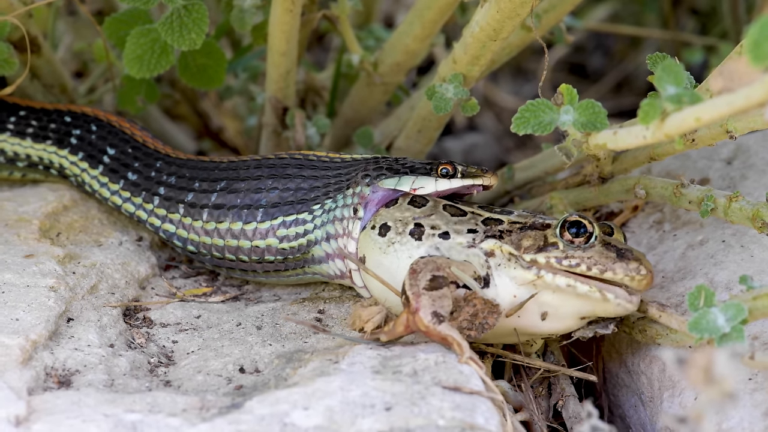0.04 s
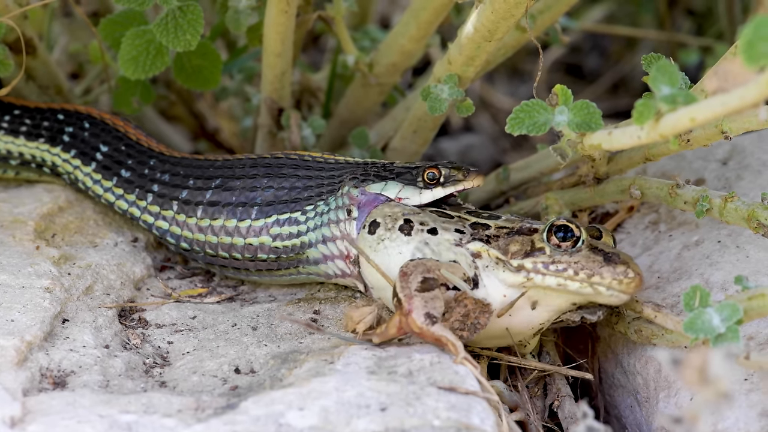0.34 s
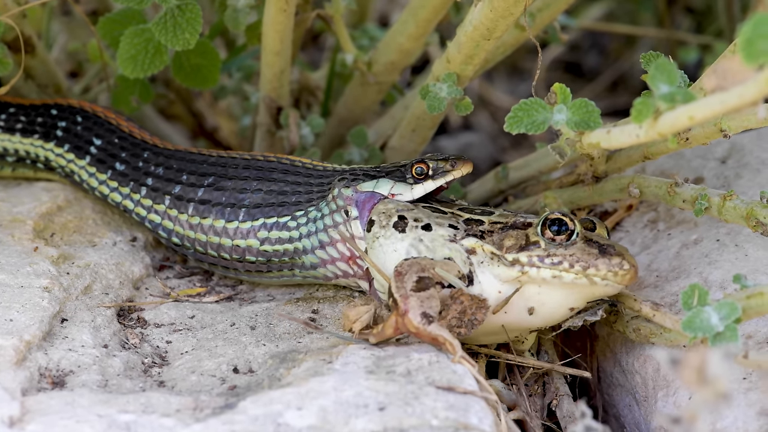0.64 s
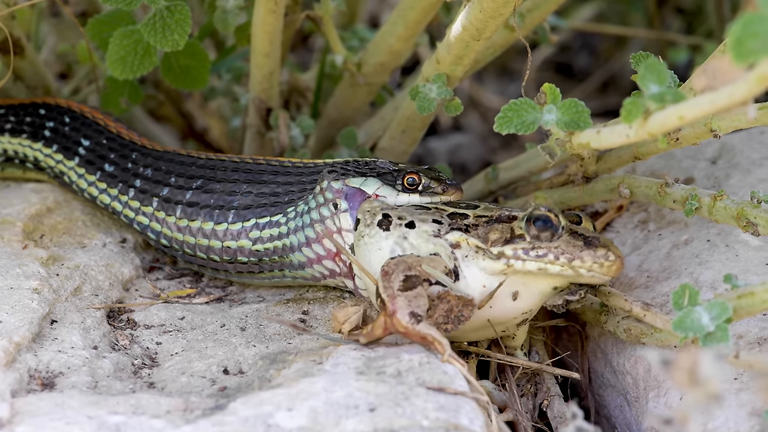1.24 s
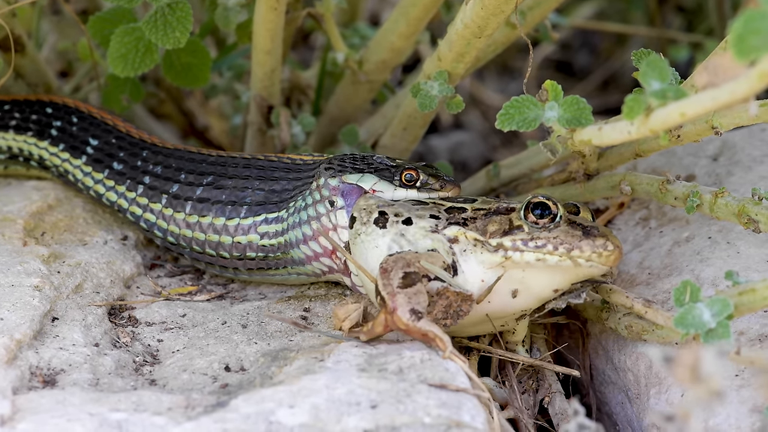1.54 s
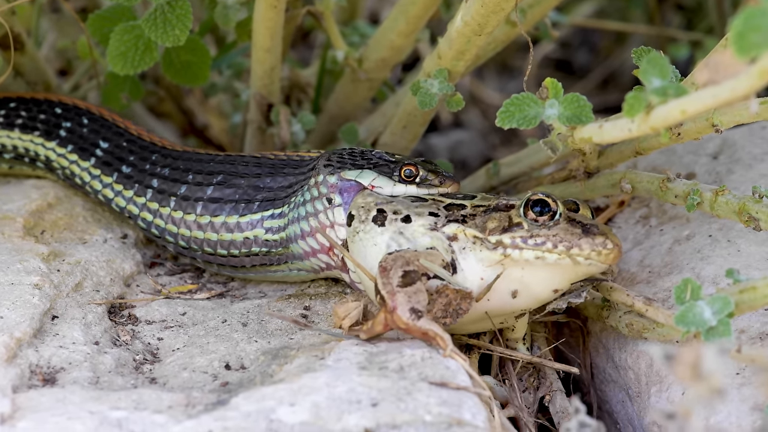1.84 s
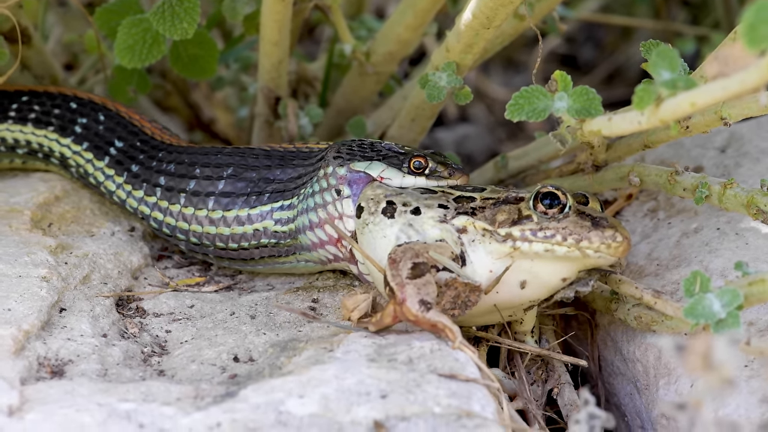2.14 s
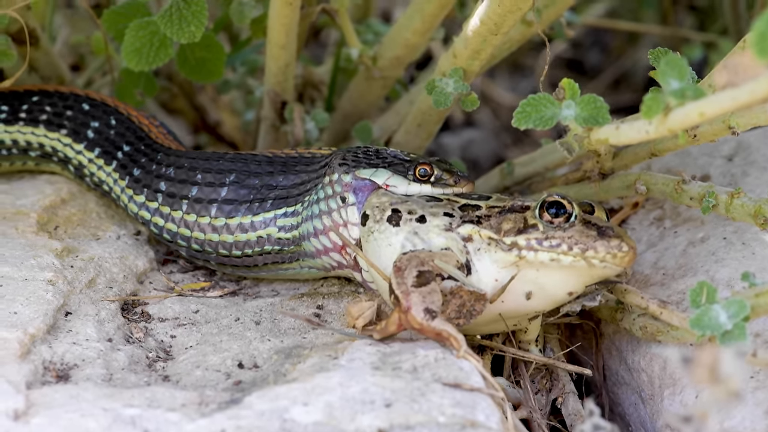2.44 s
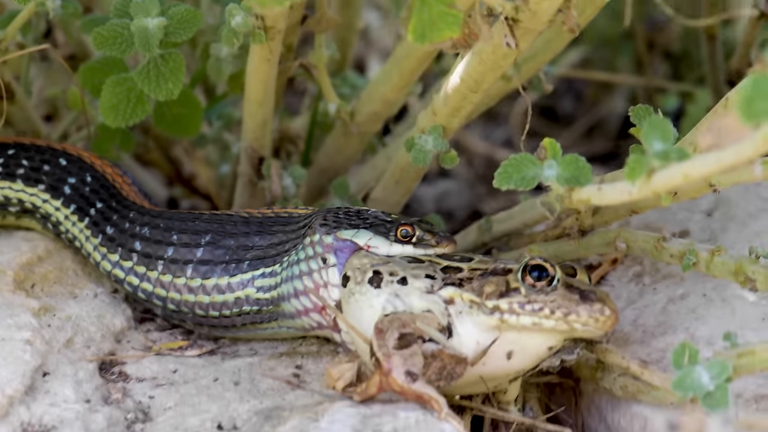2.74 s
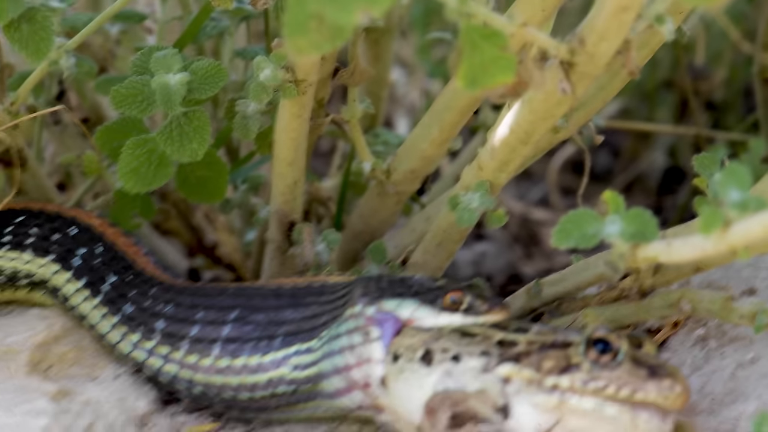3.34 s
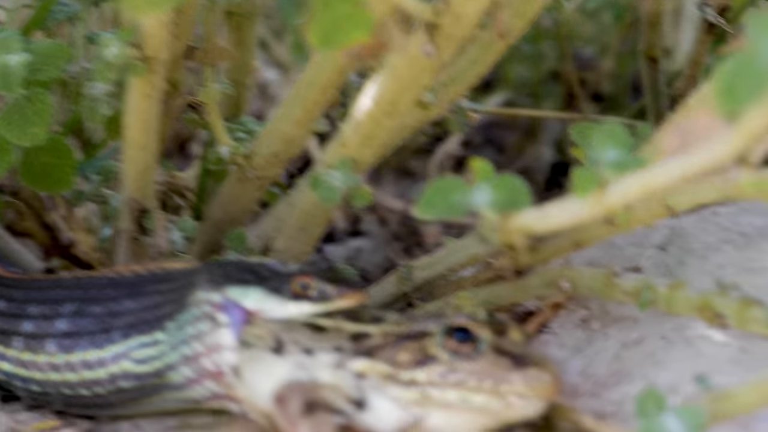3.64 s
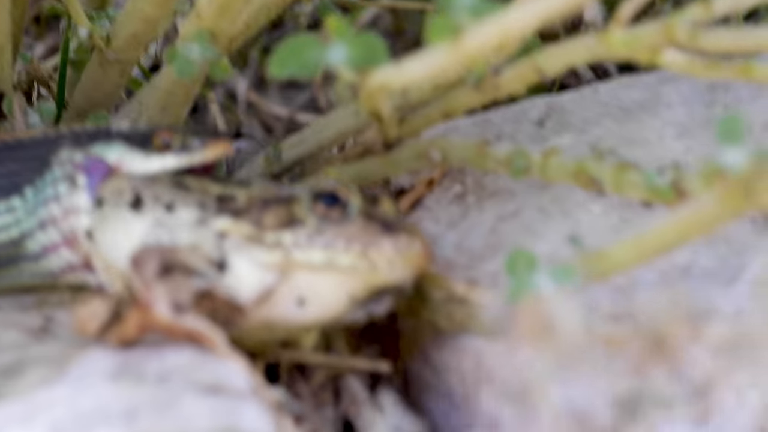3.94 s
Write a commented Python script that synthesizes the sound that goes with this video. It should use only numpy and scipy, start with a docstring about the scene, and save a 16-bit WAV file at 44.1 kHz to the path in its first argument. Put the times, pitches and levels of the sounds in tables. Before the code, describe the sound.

Close to the microphone outdoors, a frog cries twice in distress, about three seconds apart. Between the short, buzzy cries come soft gulps, puffs of air and faint rustling, with distant insect hiss and a low hum behind.

```python
"""Frog distress cries

A frog held by a snake cries twice, close by; a closed-mouth whimper leads in the second cry. Each cry is
a pulse train that rises and sags in pitch and rings a narrow resonance while the mouth snaps open and
slowly shuts. Between cries the frog gulps and pumps air, and dry litter ticks. Distant insects hiss over
a low electrical hum and a thin electronic whine."""
import sys
import numpy as np
from scipy import signal
from scipy.fft import rfft, irfft
from scipy.io import wavfile
from scipy.ndimage import uniform_filter1d

SR = 44100
rng = np.random.default_rng(int(sys.argv[2]) if len(sys.argv) > 2 else 0)


def file_out(sig):
    """Save sig as 16-bit WAV at sys.argv[1]."""
    # one column per channel
    cols = np.atleast_2d(sig).T
    # limit, then scale
    lim = np.clip(cols, -1, 1)
    pcm = np.round(lim * 32767).astype(np.int16)
    wavfile.write(sys.argv[1], SR, pcm)


N = 176400
TIME_S = np.arange(N) / SR
BINS_HZ = np.arange(N // 2 + 1) * SR / N

# Background air: freq_hz, relative_db
AIR_SPECTRUM = [(25, -6), (55, 0), (130, 0), (250, -3.5), (400, -11), (700, -15), (1500, -16), (4000, -17),
                (12000, -18), (14500, -17), (15500, -12)]
# Left-right likeness of air and insects: freq_hz, correlation
STEREO_CORRELATION = [(60, 0.74), (290, 0.99), (640, 0.43), (1400, 0.6), (3100, 0.49), (6800, 0.085),
                      (15000, 0)]
# Electrical hum: freq_hz, rms_db, waver_ratio
HUM_TONES = [(60.4, -53, 0.44), (119.8, -38.5, 0.11), (146.3, -52, 0.59), (177.2, -56, 0.31)]
# Insect chorus loudness: time_s, level_db
INSECT_ENVELOPE = [(0, -44.5), (1.1, -45), (1.4, -45), (2.1, -43), (2.8, -40), (3.4, -37.5), (3.8, -36.5),
                   (4, -39)]
# Insect hiss: freq_hz, relative_db
INSECT_SPECTRUM = [(3000, -16), (5500, -11.5), (7200, -4.5), (8500, -2), (9400, -1), (10500, -12.5),
                   (12500, -14.5), (15500, -8.5)]
# Dry litter ticks: start_s, relative_db, pitch_hz
LITTER_TICKS = [(0.404, -42.5, 4500), (0.4335, -41.5, 2080), (0.9399, -44, 1850), (0.959, -40, 2380),
                (1.0842, -41, 4070), (1.096, -42, 2300), (1.158, -44.5, 3730), (1.2367, -41, 2100),
                (1.344, -40, 3440), (1.4527, -40, 2410), (1.5884, -43, 3460), (1.6978, -42, 4250),
                (1.783, -40.5, 3580), (2.0508, -41.5, 2420), (2.29, -42.5, 4650), (2.422, -39.5, 3730)]
# Stirring in the litter: time_s, gain_db
RUSTLE_ENVELOPE = [(0, -2.5), (.8, -4), (1.1, 0.5), (1.8, -3.5), (2.5, -1.5), (3, -1.5)]
# Dull bumps: start_s, level_db
DULL_BUMPS = [(0.295, -41), (0.612, -40.5), (0.885, -39)]

# Nostril puffs: centre_s, half_length_s, level_db
NOSTRIL_PUFFS = [(2.675, 0.05, -48.5), (2.857, 0.031, -46), (2.962, 0.055, -46.5), (3.096, 0.074, -47),
                 (3.161, 0.019, -45.5), (3.85, 0.16, -56)]
# Nostril air: freq_hz, relative_db
NOSTRIL_SPECTRUM = [(300, -35), (600, -9.5), (780, -12), (930, 10), (1080, -6), (1480, -12.5), (1720, 8),
                    (1950, -13), (2500, -12), (3500, -16.5), (8000, -45)]
# Soft gulps: start_s, decay_s, level_db, pitch_hz
SOFT_GULPS = [(0.876, 0.0051, -31.5, 553), (0.892, 0.008, -42, 670), (2.782, 0.012, -32, 732)]
# Throat clicks before the whimper: start_s, impulse_db
THROAT_CLICKS = [(3.151, -29), (3.16, -25), (3.1653, -25), (3.1731, -21), (3.185, -35)]
# Click resonances: centre_hz, width_hz, gain_db
CLICK_MODES = [(950, 310, -0.74), (2300, 1500, -1.1)]

# Vocal pulse rate per cry: time_s, pitch_hz
CRY_1_PITCH = [(0, 314.4), (.02, 279), (.035, 273), (.055, 284.3), (.07, 312), (.09, 361), (.115, 402),
               (.135, 408), (.17, 384.8), (.215, 362.6), (.24, 331.7), (.255, 337.6), (.29, 233)]
CRY_2_PITCH = [(3.22, 240), (3.275, 253.8), (3.305, 306), (3.345, 242), (3.40, 258.7), (3.45, 261.5),
               (3.475, 275.5), (3.496, 328.5), (3.522, 367.3), (3.534, 409), (3.56, 443.3), (3.58, 450.5),
               (3.61, 438.6), (3.68, 364), (3.72, 274)]
# Effort and mouth shape: time_s, level_db, mouth_hz, upper_hz, ring_hz, ring_width_hz, tilt_db_per_oct
CRY_1_MOUTH = [(0.0, -33, 1920.0, 2630.0, 2080.0, 360.0, -3), (0.022, -31, 2600, 3800, 3460, 269, 1.5),
               (0.05, -26, 2520, 4340, 3680, 370.0, 3.5), (0.08, -18, 2550, 4800, 3600, 360.0, 0.5),
               (0.106, -13.5, 2390, 6070.0, 3410, 150.0, -3.0), (0.135, -13.5, 2220, 5100, 3340, 160.0, -2),
               (0.18, -14.5, 2150, 4870, 3285, 160.0, -4), (0.223, -16.0, 2160, 3660.0, 3080, 290.0, -5.5),
               (0.244, -27, 1360, 2890.0, 3000, 740.0, -3.5), (0.29, -53, 934, 2200.0, 1760.0, 590.0, -18)]
CRY_2_MOUTH = [(3.22, -47, 1450.0, 2600.0, 2490.0, 480.0, -3.5),
               (3.27, -44, 1630.0, 2610.0, 2500, 500.0, -2), (3.3, -34.5, 1500, 2670.0, 2080.0, 770.0, 4),
               (3.35, -44.5, 1400, 2720.0, 2610, 570.0, -0.5),
               (3.441, -34.5, 1539, 2920.0, 2440, 820.0, 0.5),
               (3.468, -19.5, 2480, 3720.0, 2810.0, 390.0, 2.5), (3.485, -19.5, 2750, 3200, 3700, 507, 0.5),
               (3.529, -16.5, 2640, 3153, 3870, 270.0, -3), (3.55, -15, 2590.0, 2440.0, 3820, 398, 1.5),
               (3.58, -14, 1950, 2900, 4060, 490, 3.5), (3.62, -16.0, 1580, 2800.0, 3900.0, 670, 4.5),
               (3.669, -14.5, 880, 2980, 2970, 370.0, 2), (3.69, -27, 1055, 2777, 2717, 560.0, -6),
               (3.729, -56.5, 755, 2250.0, 1990.0, 570.0, -17)]
# Throat resonances: centre_hz, width_hz
THROAT_MODES = [(461, 204), (950, 414)]
# Buzzing top of the voice: freq_hz, harmonic_relative_db
BUZZ_SPECTRUM = [(3500, -36), (4900, -39), (5800, -35), (6700, -42), (8000, -35.5), (8900, -39),
                 (10200, -27.5), (11500, -44), (13000, -41), (15300, -37)]
# Air in the cry: freq_hz, relative_db
RASP_SPECTRUM = [(300, -2), (900, -14.5), (3500, 2.5), (4800, -2), (6200, -1.5), (8000, -13), (10500, -12),
                 (15000, -27)]
# Frog level at the two microphone ports: freq_hz, left_minus_right_db
PORT_BALANCE_DB = [(270, -1.5), (740, -1.5), (1220, 1), (2010, -2.5), (3330, 1.5), (5500, -3), (9080, 1.5),
                   (15000, -3)]
# Frog phase at the ports: freq_hz, left_lead_rad
PORT_PHASE_RAD = [(0, 0), (2930, -0.0), (4130, -1.47), (5680, 1.5), (6980, -9), (7670, 1.5), (8870, 1),
                  (10400, -5.5), (10700, -0.2), (14000, 3), (15700, 8.0), (16600, 8.2)]

CUTOFF_HZ = 15900


def from_db(db):
    """Decibels to gain."""
    return 10 ** (np.asarray(db) / 20)


def unit_rms(x):
    """Scale to rms 1."""
    return x / np.sqrt(np.mean(x ** 2) + 1e-20)


def at_time(rows, t):
    """Each value column at times t."""
    time_s, *columns = np.transpose(rows)
    return [np.interp(t, time_s, column) for column in columns]


def at_hz(points, hz):
    """Interpolate on a log-frequency axis."""
    freq_hz, value = np.transpose(points)
    return np.interp(np.log(np.maximum(hz, 1)), np.log(freq_hz), value)


def random_curve(position):
    """Line through Gaussian values at whole positions."""
    return np.interp(position, np.arange(4096), rng.standard_normal(4096))


def drift(rate_hz, t):
    """Random wander, spread near 1."""
    return random_curve((t - t[0]) * rate_hz * 2)


def noise(spectrum, correlation=None, ripple_db=0, line_width_hz=56.1):
    """Coloured noise, rms 1; ripple adds narrow lines, a correlation table makes it stereo."""
    gain_db = at_hz(spectrum, BINS_HZ) + ripple_db * random_curve(BINS_HZ / line_width_hz)
    mid, side = rfft(rng.standard_normal((2, N))) * from_db(gain_db)
    if correlation is None:
        return unit_rms(irfft(mid, N))
    alike = at_hz(correlation, BINS_HZ)
    return unit_rms(irfft(np.sqrt(1 + alike) * mid + np.sqrt(1 - alike) * side * [[1], [-1]], N))


def resonance(hz, centre_hz, width_hz):
    """Complex gain of one resonance."""
    return 1 / (1 - (hz / centre_hz) ** 2 + 1j * hz * width_hz / centre_hz ** 2)


def ring(x, hz, width_hz):
    """Resonant band-pass, peak gain 1."""
    r = np.exp(-np.pi * width_hz / SR)
    feedback = [1, -2 * r * np.cos(2 * np.pi * hz / SR), r * r]
    return signal.lfilter(np.array([1, 0, -1]) * (1 - r * r) / 2, feedback, x + 1e-18)


def swell(centre_s, half_length_s):
    """Raised-cosine window."""
    return np.cos(np.pi / 2 * np.clip((TIME_S - centre_s) / half_length_s, -1, 1)) ** 2


def tone(hz, rms_db, waver):
    """Sine wavering in level and phase."""
    wobble = 1 + waver * (drift(4.06, TIME_S) + 1j * drift(2.2, TIME_S))
    return from_db(rms_db) * unit_rms((wobble * np.exp(2j * np.pi * hz * TIME_S)).real)


def plop(start_s, decay_s, level_db, pitch_hz, rise_hz_per_s=0, attack_s=0.00093):
    """Softly struck, decaying sine; pitch may rise."""
    t = np.maximum(TIME_S - start_s, 0)
    envelope = (1 - np.exp(-t / attack_s)) * np.exp(-np.minimum(t / decay_s, 40))
    return from_db(level_db) * envelope * np.sin(2 * np.pi * (pitch_hz + rise_hz_per_s * t / 2) * t)


def electrics(whine_hz=15665, whine_pan_db=15.5):
    """Low hum in the centre, thin whine to the left."""
    hum = sum(tone(*row) for row in HUM_TONES)
    pan = from_db([[whine_pan_db / 2], [-whine_pan_db / 2]])
    return hum + pan * tone(whine_hz, rms_db=-48, waver=0.3)


def insects(crossfade_s=0.87):
    """Distant chorus: sets of narrow noise lines crossfade as the level grows."""
    chorus = sum(np.sqrt(swell(k * crossfade_s, crossfade_s))
                 * noise(INSECT_SPECTRUM, STEREO_CORRELATION, ripple_db=3.5) for k in range(8))
    level_db = at_time(INSECT_ENVELOPE, TIME_S)[0] + 1.45 * drift(12, TIME_S)
    return from_db(level_db) * unit_rms(chorus)


def litter_rustle(clicks_per_s=150, spread_db=3.2, base_db=-54.5):
    """Faint random clicks, each ringing one of ten resonances."""
    sizes = from_db(spread_db * np.minimum(rng.exponential(1, N), 4)) * rng.choice([-1, 1], N)
    clicks = sizes * (rng.random(N) < clicks_per_s / SR)
    modes_hz = np.geomspace(1700, 4400, 10)
    mode = rng.integers(0, len(modes_hz), N)
    rustle = sum(ring(clicks * (mode == k), hz, width_hz=410) for k, hz in enumerate(modes_hz))
    return from_db(base_db + at_time(RUSTLE_ENVELOPE, TIME_S)[0]) * unit_rms(rustle)


def litter_ticks(decay_s=0.0072, gain_db=8.02):
    """Short noise bursts drive a narrow resonance and a broad crack."""
    out = np.zeros(N)
    for start_s, relative_db, pitch_hz in LITTER_TICKS:
        burst = rng.standard_normal(2048) * np.exp(-TIME_S[:2048] / decay_s)
        tick = ring(burst, pitch_hz, width_hz=200) + 0.21 * ring(burst, hz=3300, width_hz=4400)
        start = int(start_s * SR)
        out[start:start + len(tick)] += from_db(relative_db + gain_db) * tick / abs(tick).max()
    return out


def bumps():
    """Faint, dull low knocks."""
    return sum(plop(start_s, decay_s=0.014, level_db=db, pitch_hz=266) for start_s, db in DULL_BUMPS)


def pumping(click_top_hz=2930):
    """The frog refills its lungs: nostril puffs, rising gulps, dry throat clicks."""
    airflow = sum(from_db(db) * np.sqrt(swell(s, half_s)) for s, half_s, db in NOSTRIL_PUFFS)
    puffs = airflow * noise(NOSTRIL_SPECTRUM)
    gulps = sum(plop(*row, rise_hz_per_s=6800) for row in SOFT_GULPS)
    impulses = np.zeros(N)
    for start_s, impulse_db in THROAT_CLICKS:
        impulses[int(start_s * SR)] += from_db(impulse_db)
    clicks = sum(from_db(db) * ring(impulses, hz, width_hz) * SR / (2 * np.pi * width_hz)
                 for hz, width_hz, db in CLICK_MODES)
    return puffs + gulps + signal.sosfilt(signal.butter(4, click_top_hz, fs=SR, output="sos"), clicks)


def vocal_tract(hz, shape, emphasis_db):
    """Complex gain per harmonic through throat and mouth, total power 1."""
    mouth_hz, upper_hz, ring_hz, ring_width_hz, tilt_db_per_oct = shape
    cavity_hz, notch_width_hz, notch_db, top_hz = 1534, 100, -5.5, 4470
    gain = np.prod([resonance(hz, mode_hz, width_hz) * (hz / mode_hz) ** 2
                    for mode_hz, width_hz in THROAT_MODES], axis=0)
    gain *= resonance(hz, mouth_hz, width_hz=1120) * resonance(hz, upper_hz, width_hz=2270)
    gain *= resonance(hz, ring_hz, ring_width_hz)
    gain *= from_db(tilt_db_per_oct * np.log2(hz / hz[0]) + emphasis_db)
    gain /= np.sqrt(1 + (hz / top_hz) ** 11)
    # A side cavity cuts a notch and delays part of each pulse.
    gain *= from_db(notch_db * np.exp(-((hz - cavity_hz) / notch_width_hz) ** 2))
    gain *= np.exp(2j * np.angle(resonance(hz, cavity_hz, width_hz=300)))
    return gain / np.sqrt(np.sum(abs(gain) ** 2, axis=0))


def cry(pitch, mouth):
    """Vocal pulses as 60 harmonics through the tract, plus a buzzing top and pulse-gated air."""
    firm_db, full_push_hz_per_s, attack_s = -27, 2000, 0.014
    voice_wander_db, buzz_wander_db = 0.9, 4
    buzz_trim_db, buzz_db_per_oct, buzz_ref_hz = -0.5, 14, 413
    rasp_db, rasp_push_db = -33, 15
    span = (TIME_S >= mouth[0][0]) & (TIME_S <= mouth[-1][0])
    t = TIME_S[span]
    aim_hz, = at_time(pitch, t)
    level_db, *shape = at_time(mouth, t)
    # A weak voice shakes; pushing the pitch up adds air.
    weak = np.clip((firm_db - level_db) / 10, 0, 1)
    push = np.clip(uniform_filter1d(np.gradient(aim_hz, t), size=600) / full_push_hz_per_s, 0, 1)
    jitter = (0.0025 + 0.014 * weak) * drift(89.8, t)
    pitch_hz = aim_hz * (1 + jitter)
    phase_rad = 2 * np.pi * np.cumsum(pitch_hz) / SR
    order = np.arange(1, 61)[:, None]
    hz = order * pitch_hz
    wander = np.array([drift(12, t) for _ in order])
    flutter = np.array([drift(120, t) + 1j * drift(120, t) for _ in order])
    tract = vocal_tract(hz, shape, voice_wander_db * wander)
    buzz_db = at_hz(BUZZ_SPECTRUM, hz) + buzz_trim_db + buzz_wander_db * wander
    buzz_db += buzz_db_per_oct * np.log2(aim_hz / buzz_ref_hz)
    partials = tract * (1 + 0.045 * flutter) + from_db(buzz_db) * (1 + 0.18 * flutter)
    voice = np.sqrt(2) * np.sum(partials * (hz < CUTOFF_HZ) * np.exp(1j * order * phase_rad), axis=0).real
    gate = 1 + np.cos(phase_rad - 1)
    rasp = from_db(rasp_db + rasp_push_db * push) * noise(RASP_SPECTRUM)[span] * gate
    shimmer = 0.06 * (1 + 2 * weak + push) * drift(150, t)
    envelope = np.clip((t - t[0]) / attack_s, 0, 1) * from_db(level_db)
    out = np.zeros(N)
    out[span] = envelope * (voice * (1 + shimmer) + rasp)
    return out


def at_ports(x):
    """A close source reaches each microphone port with its own level and phase."""
    sides = np.array([[0.5], [-0.5]])
    gain = from_db(sides * at_hz(PORT_BALANCE_DB, BINS_HZ))
    phase_rad = sides * at_hz(PORT_PHASE_RAD, BINS_HZ)
    return irfft(rfft(x) * gain * np.exp(1j * phase_rad), N)


def scene():
    """Close frog over hum, whine, litter, insects, bumps and air."""
    frog = cry(CRY_1_PITCH, CRY_1_MOUTH) + cry(CRY_2_PITCH, CRY_2_MOUTH) + pumping()
    background = electrics() + litter_ticks() + litter_rustle() + insects() + bumps()
    air = from_db(-43.5) * noise(AIR_SPECTRUM, STEREO_CORRELATION)
    return air + background + at_ports(frog)


def record(dry):
    """Steep elliptic low-pass."""
    return signal.sosfilt(signal.ellip(12, .1, 90, CUTOFF_HZ, fs=SR, output="sos"), dry)


dry = scene()
out = record(dry)
file_out(out)
```